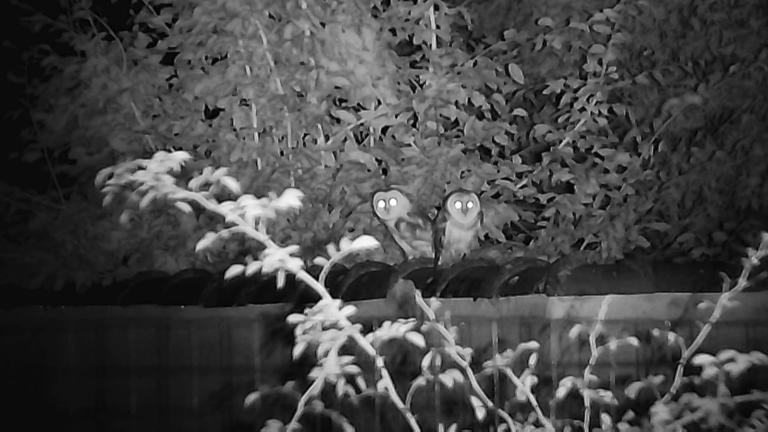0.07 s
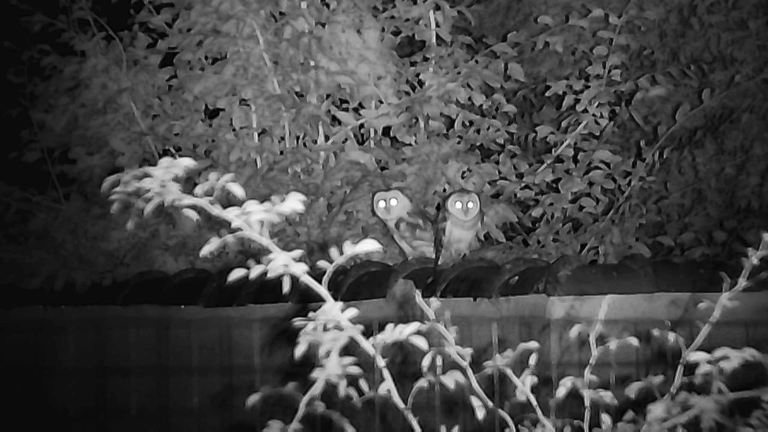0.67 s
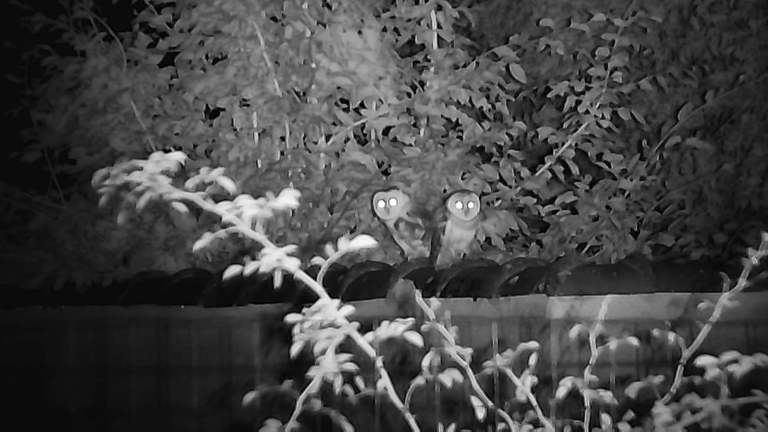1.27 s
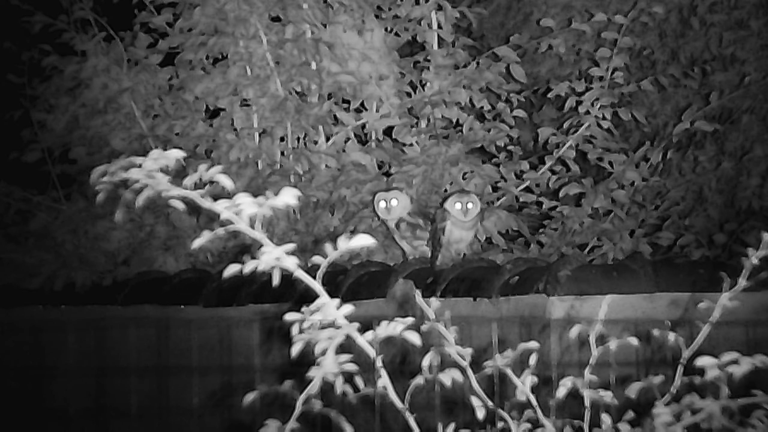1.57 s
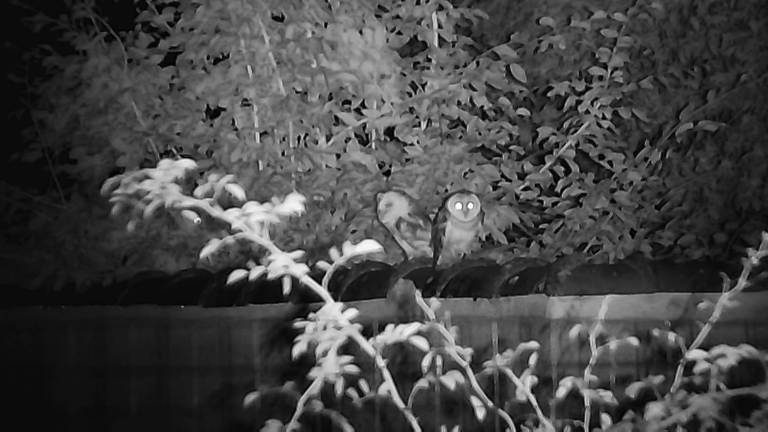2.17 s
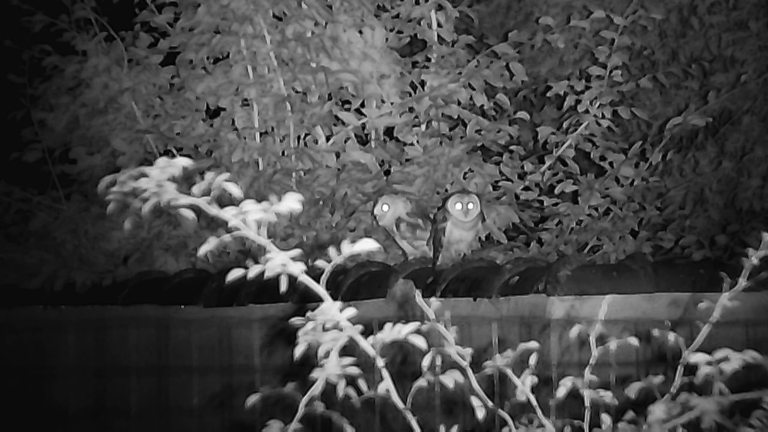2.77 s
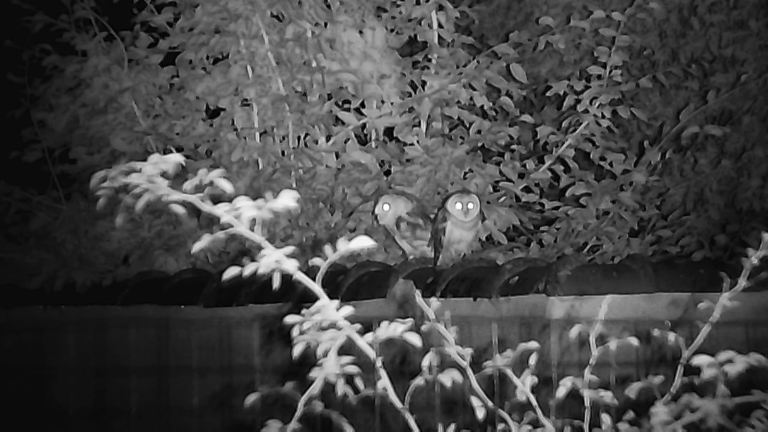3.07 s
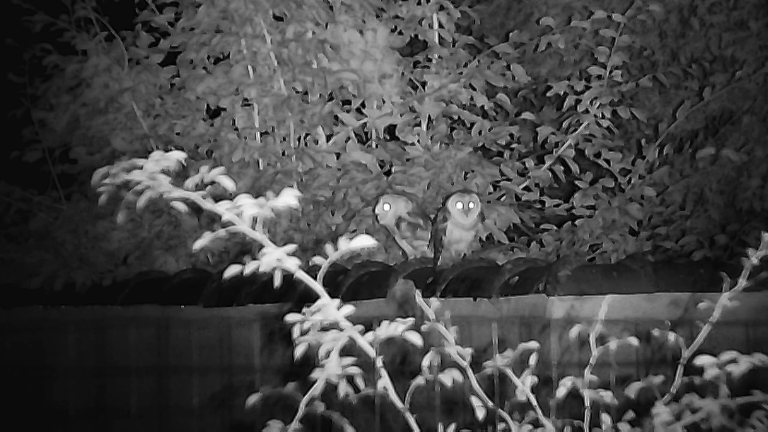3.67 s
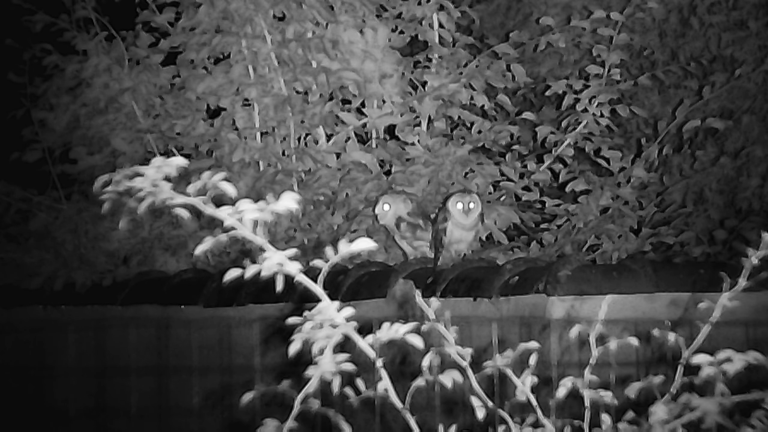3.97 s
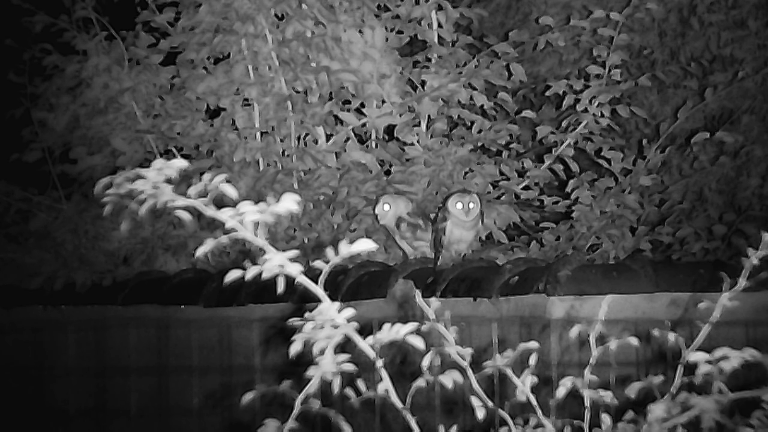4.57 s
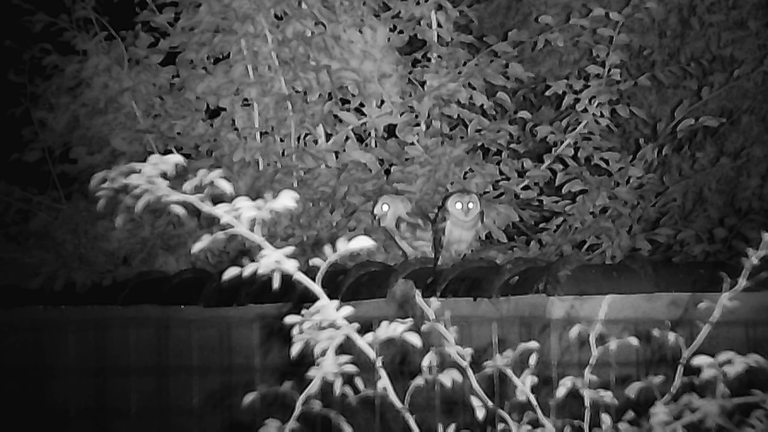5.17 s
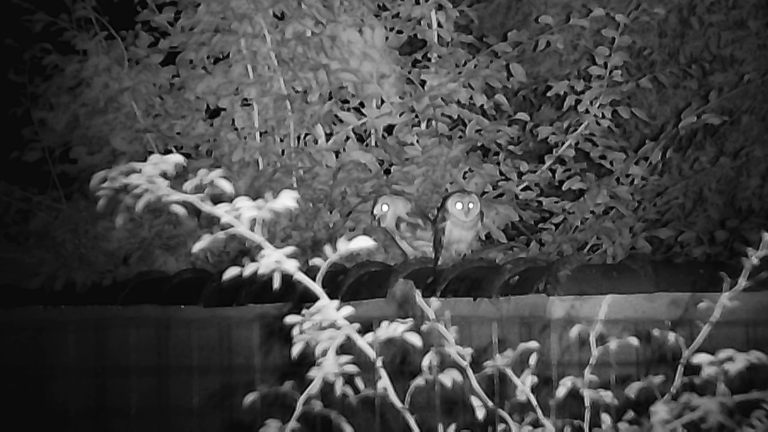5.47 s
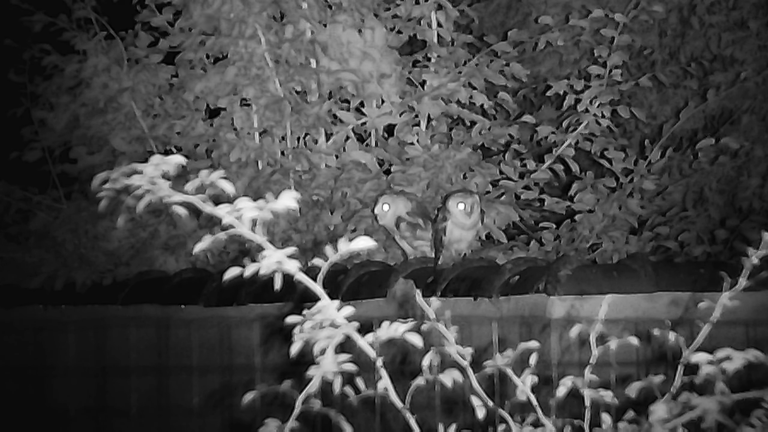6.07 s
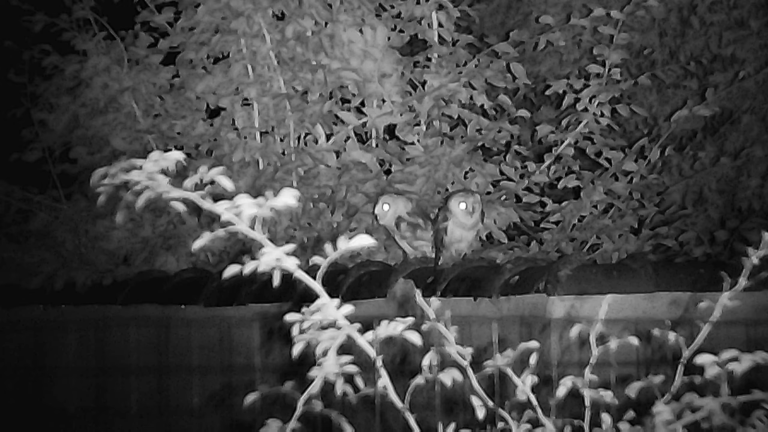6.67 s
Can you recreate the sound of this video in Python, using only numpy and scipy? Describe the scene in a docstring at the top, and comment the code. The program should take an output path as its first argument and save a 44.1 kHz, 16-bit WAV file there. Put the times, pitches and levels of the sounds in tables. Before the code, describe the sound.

Young barn owls hiss faintly beneath constant background noise and far town rumble, until a breeze briefly buffets the microphone.

```python
"""A garden at night, heard through the small microphone of a night camera. From the first moment a young
barn owl is hissing on a wall some way off, over the distant rumble of the town and the slow throb of a far
machine; the camera adds its own hiss and a thin electrical buzz. The owls beg four more times, faint and
rasping, forcing air through their throats. Near the end, under the last two hisses, eddies bump the
microphone and a breeze buffets it."""
import sys
import numpy as np
from scipy import signal
from scipy.fft import rfft, irfft, next_fast_len
from scipy.io import wavfile
from scipy.ndimage import uniform_filter1d

SR = 44100
rng = np.random.default_rng(int(sys.argv[2]) if len(sys.argv) > 2 else 0)


def generate_wav(signal):
    """Clip the signal to [-1, 1] and save it as 16-bit WAV at the path in sys.argv[1]."""
    frames = np.transpose(np.atleast_2d(signal))
    scaled = np.clip(frames, -1, 1) * 32767
    pcm = np.round(scaled).astype(np.int16)
    wavfile.write(sys.argv[1], SR, pcm)


N = 305172


def undb(db):
    """Decibels to gain."""
    return np.exp(np.asarray(db) * (np.log(10) / 20))


def unit(x):
    """Scale to rms 1."""
    return x / np.sqrt(np.mean(x ** 2))


def colour(points, hz):
    """Gain at these frequencies from (Hz, dB) points on a log axis."""
    f, db = np.transpose(points)
    return undb(np.interp(np.log(np.maximum(hz, 1)), np.log(f), db))


def noise(gain_at):
    """Noise of rms 1 whose spectrum follows a function of frequency."""
    size = next_fast_len(N)
    spectrum = rfft(rng.standard_normal(size)) * gain_at(np.fft.rfftfreq(size, 1 / SR))
    return unit(irfft(spectrum, size)[:N])


def walk(rate_hz):
    """Random levels held 1 / rate_hz seconds and smoothed twice; rms 1."""
    hold = max(int(SR / rate_hz), 1)
    steps = np.repeat(rng.standard_normal(N // hold + 1), hold)
    return unit(uniform_filter1d(uniform_filter1d(steps, hold), hold)[:N])


def bell(t, length):
    """A smooth rise and fall around t = 0, down to 1 / e at this length either side."""
    return np.exp(-(t / length) ** 2)


# begging hisses from the wall: start_s, end_s, swell_s, level_db
BEGGING_HISSES = [(-.1, 0.506, .05, -61.5), (2.147, 2.804, 0.31, -63.5), (3.302, 4.152, 0.45, -60.5),
                  (5.352, 5.78, 0.058, -66.5), (6.1, 7.05, .18, -63)]
# resonances of throat and open bill: pitch_hz, width_hz, relative_db, rise_db_per_effort_db
THROAT_RESONANCES = [(2950, 130, -7, 0), (3335, 160, 1, .45), (3660, 90, -4.5, 0), (3950, 450, -7.5, 0),
                     (4570, 180, -5.5, 0), (5250, 250, -6, -.5), (5830, 250, -1.7, .7), (6220, 220, -9, 0)]


def owls(rasp_db=2, rasp_hz=110, sag_db=3.5, release_s=0.043, usual_db=-61.5):
    """On the wall, some way off: air forced through a narrow throat rings it; effort lifts two peaks."""
    t = np.arange(N) / SR
    breath = 0
    for start, end, swell, level_db in BEGGING_HISSES:
        # each hiss swells, sags as the air runs out, and breaks off
        attack = np.sqrt(np.clip((t - start) / swell, 0, 1))
        progress = np.clip((t - start) / (end - start), 0, 1)
        release = np.clip((end - t) / release_s, 0, 1)
        breath = breath + attack * release * undb(level_db - sag_db * progress ** 4)
    effort_db = np.clip(20 * np.log10(breath + 1e-9) - usual_db, -10, 10)
    hiss = 0
    for hz, width, db, rise in THROAT_RESONANCES:
        ring = noise(lambda f: 1 / (1 + ((f - hz) / width) ** 2) ** 2) * np.sqrt(width)
        hiss = hiss + ring * undb(db + rise * effort_db)
    # the jet sputters, which makes the hiss rasp
    rasp = hiss * undb(rasp_db * walk(rasp_hz))
    return rasp / np.sqrt(np.average(rasp ** 2, weights=breath ** 2)) * breath


# spectrum of the distant town and night air: frequency_hz, relative_db
TOWN_SPECTRUM = [(4, -12), (12, -3), (28, -0.5), (50, 0), (72, -0.5), (85, -4.5), (105, -4), (160, -8.5),
                 (250, -12.5), (500, -18), (1000, -23), (2000, -30), (4000, -41.5), (8000, -71)]


def town(level_db=-45.5, swell_db=0.8):
    """Traffic far beyond the garden, dulled by distance, that barely swells."""
    return noise(lambda f: colour(TOWN_SPECTRUM, f)) * undb(level_db + swell_db * walk(3.8))


# tones of the far machine: multiple_of_shaft_rate, level_db
SHAFT_ORDERS = [(1, -50.5), (2, -54.5), (3, -56), (4, -63)]


def machine(shaft_hz=18.85, drift=.004):
    """A slow shaft throbs far off; the air on the way makes each of its orders waver a little."""
    angle = 2 * np.pi * np.cumsum(shaft_hz * (1 + drift * walk(1))) / SR
    throb = 0
    for order, level_db in SHAFT_ORDERS:
        wavering = undb(level_db + walk(2))
        throb = throb + wavering * np.sin(order * angle + rng.uniform(0, 2 * np.pi))
    return np.sqrt(2) * throb


# outline of the buzz harmonics inside the camera: frequency_hz, level_db
BUZZ_SPECTRUM = [(64, -53), (129, -68), (258, -76), (600, -84), (2200, -88), (4500, -86), (6700, -85.5),
                 (7600, -87), (8000, -94), (8600, -106)]
# harmonics that stand out as a whine: pitch_hz, level_db
WHINE_LINES = [(5868, -81), (6449, -80), (6514, -81), (6708, -81), (7095, -76.5), (7418, -84), (7483, -85),
               (7612, -84), (7806, -87), (8000, -90)]
TOP_HZ = 8850  # upper edge of the camera's sound


def circuit_buzz(pitch_hz=64.4984, uneven_db=2, size=4096):
    """Circuits inside the camera switch in the same three bursts on every cycle."""
    cycle = np.arange(size) / size
    bursts = rng.standard_normal(size) * undb(2 * np.cos(3 * 2 * np.pi * cycle))
    burst_phase = np.angle(rfft(bursts))
    hz = np.arange(size // 2 + 1) * pitch_hz
    scatter = undb(uneven_db * rng.standard_normal(len(hz)) * (hz > 200))
    gain = colour(BUZZ_SPECTRUM, hz) * scatter * (hz > 0) * (hz < TOP_HZ)
    for line_hz, level_db in WHINE_LINES:
        gain[round(line_hz / pitch_hz)] = undb(level_db)
    one_cycle = irfft(gain * np.exp(1j * burst_phase)) * size / np.sqrt(2)
    return np.interp(np.arange(N) / SR * pitch_hz, cycle, one_cycle, period=1)


# noise floor of the microphone amplifier: frequency_hz, relative_db
AMPLIFIER_SPECTRUM = [(100, 2.5), (1500, 1.5), (3000, 1), (4500, 0), (6000, -2), (7000, -2.5), (7500, -6),
                      (8000, -10.5), (8500, -19.5), (8900, -42)]


def amplifier_hiss(level_db=-58.5):
    """The amplifier just behind the microphone hisses steadily."""
    return noise(lambda f: colour(AMPLIFIER_SPECTRUM, f)) * undb(level_db)


# single eddies right at the microphone: time_s, pitch_hz, peak_db
PORT_BUMPS = [(5.44, 48, -33), (6.101, 108, -32), (6.279, 105, -35), (6.377, 41, -25.5), (6.608, 40, -25.5),
              (6.646, 124, -37), (6.722, 55, -27)]


def eddy_bumps(half_crossing_s=0.011):
    """The largest eddies each cross the microphone port and bump it for a cycle or two."""
    t = np.arange(N) / SR
    return sum(undb(peak_db) * bell(t - at, half_crossing_s) * np.cos(2 * np.pi * hz * (t - at))
               for at, hz, peak_db in PORT_BUMPS)


# gusts on the microphone: peak_time_s, half_length_s, level_db
BREEZE_GUSTS = [(6.171, .36, -41.5), (6.673, 0.059, -29), (6.83, 0.053, -37)]
# pressure of the eddies at its port: frequency_hz, relative_db
EDDY_SPECTRUM = [(10, -6.5), (25, 3), (55, 1.5), (100, -3.5), (160, -15), (215, -13.5), (290, -34),
                 (600, -72)]


def breeze():
    """Gusts swell and die away, pushing eddies past the microphone port."""
    t = np.arange(N) / SR
    wind = sum(undb(level_db) * bell(t - at, length) for at, length, level_db in BREEZE_GUSTS)
    eddies = noise(lambda f: colour(EDDY_SPECTRUM, f))
    # even out the eddies, so the wind alone sets the strength of each gust
    local_rms = np.sqrt(uniform_filter1d(eddies ** 2, size=4000))
    return eddies / local_rms * wind


def scene():
    """The garden, the distance and the camera's own noise meet in one channel."""
    garden = owls() + town() + machine()
    camera = circuit_buzz() + amplifier_hiss()
    return (garden + camera + eddy_bumps() + breeze())[None]


def record(dry, offset=.0055):
    """The camera cuts the treble steeply; its converter rests a little off zero."""
    lowpass = signal.ellip(10, .1, 80, TOP_HZ, fs=SR, output="sos")
    return signal.sosfilt(lowpass, dry) + offset


dry = scene()
out = record(dry)
generate_wav(out)
```